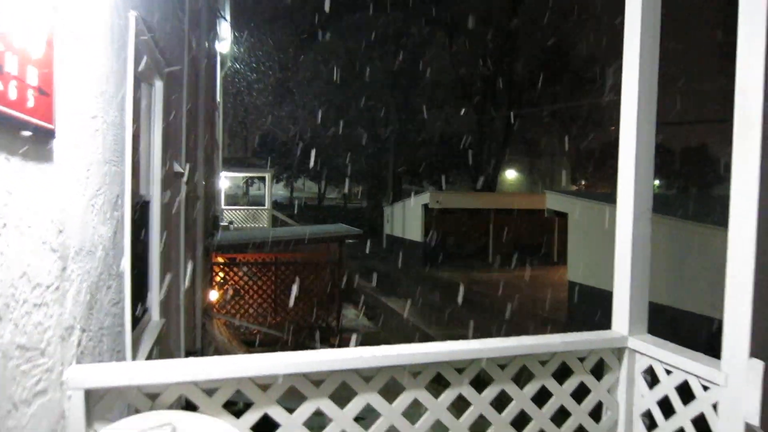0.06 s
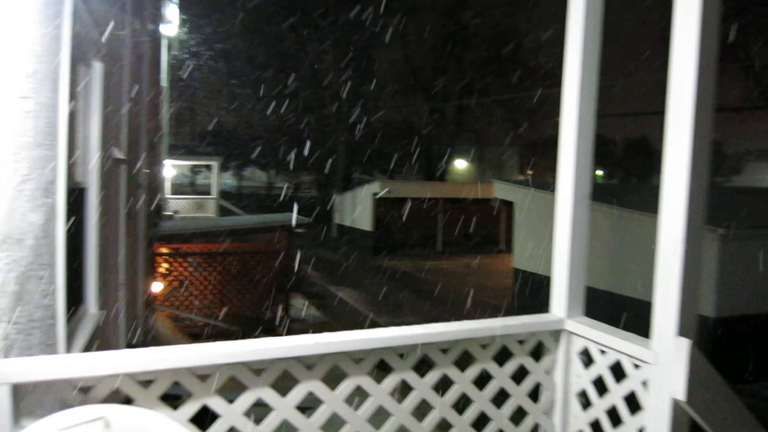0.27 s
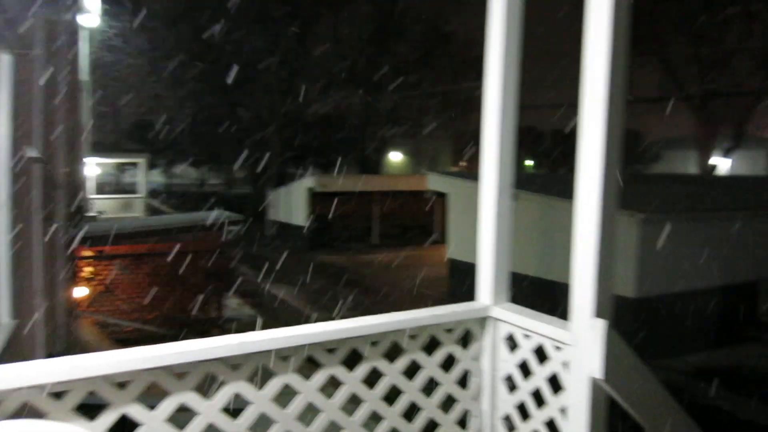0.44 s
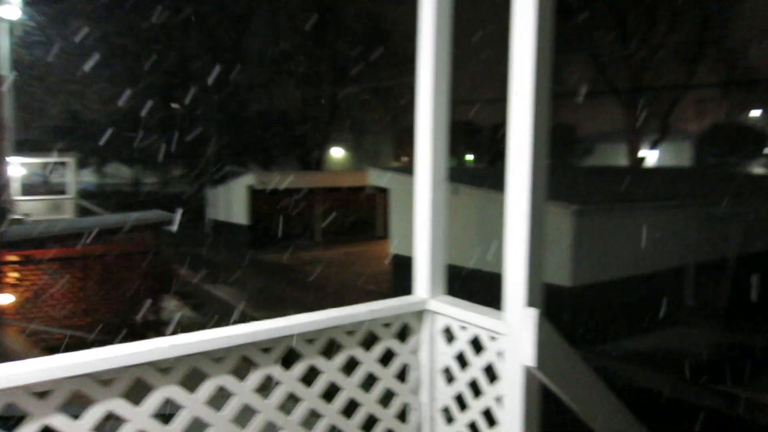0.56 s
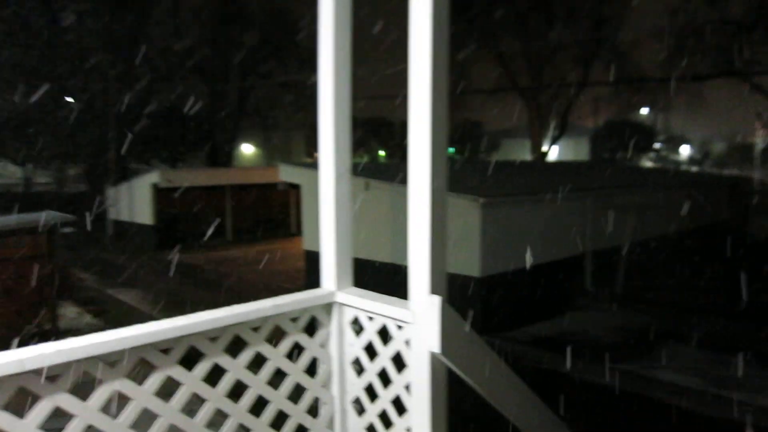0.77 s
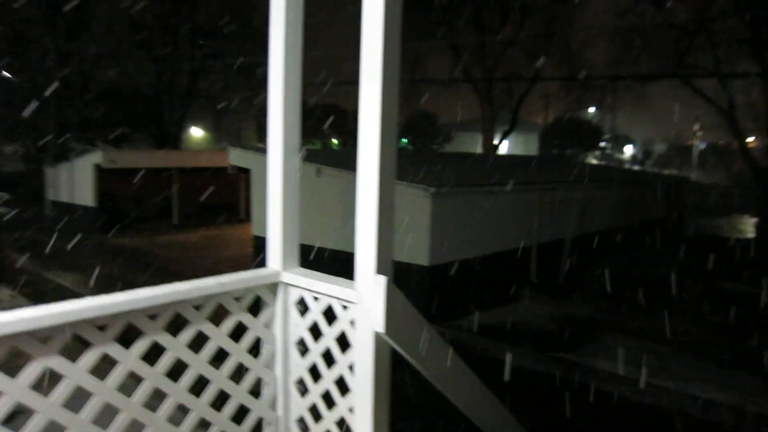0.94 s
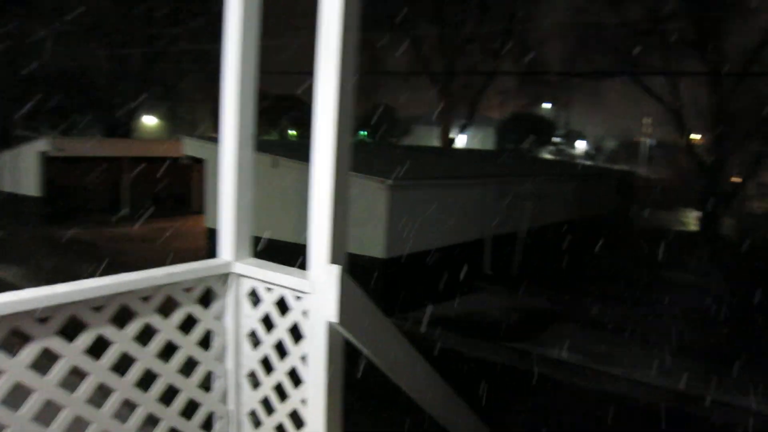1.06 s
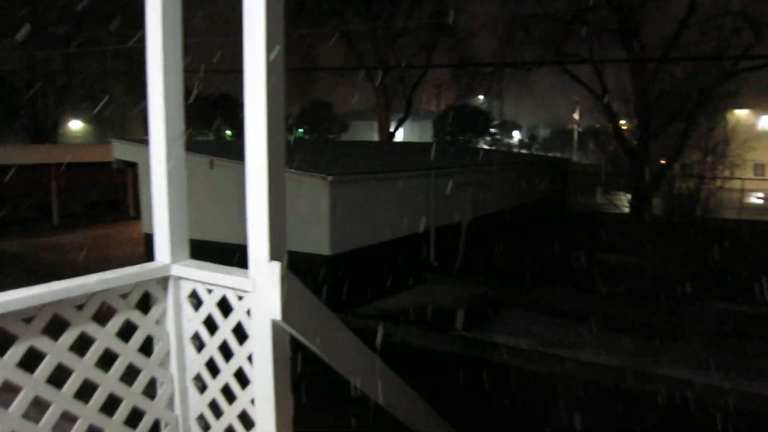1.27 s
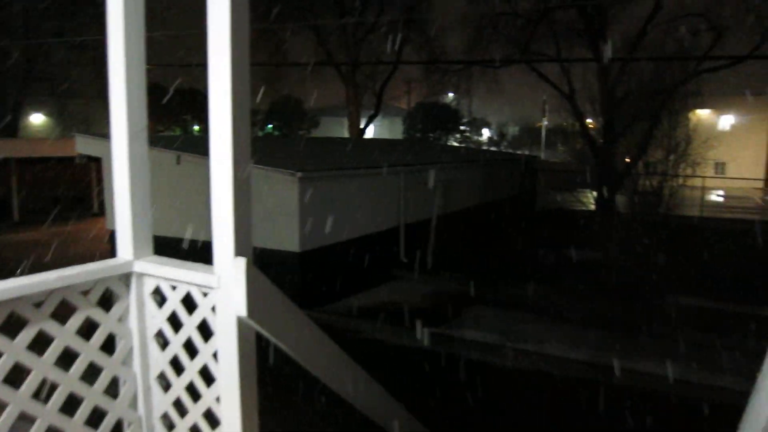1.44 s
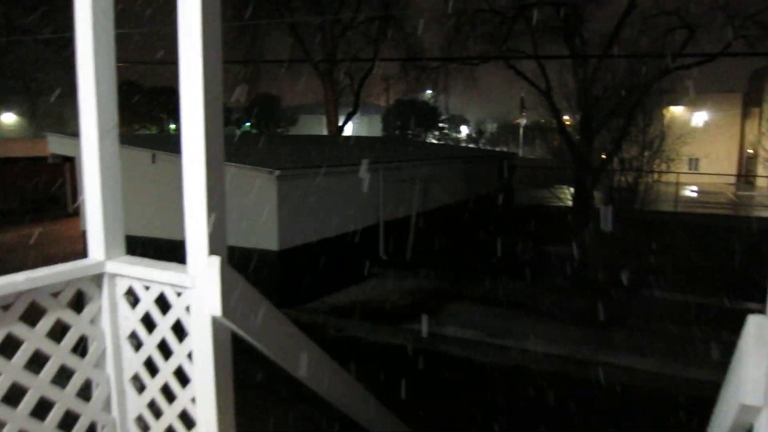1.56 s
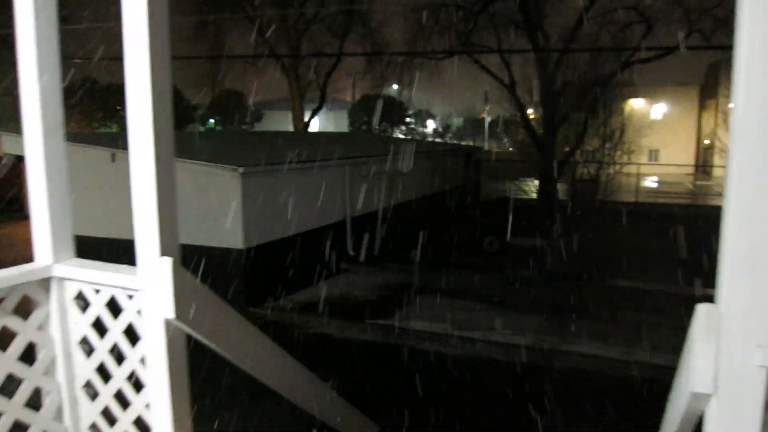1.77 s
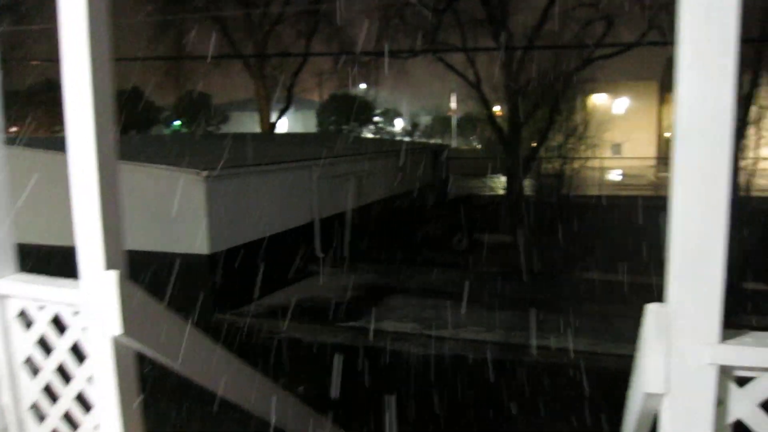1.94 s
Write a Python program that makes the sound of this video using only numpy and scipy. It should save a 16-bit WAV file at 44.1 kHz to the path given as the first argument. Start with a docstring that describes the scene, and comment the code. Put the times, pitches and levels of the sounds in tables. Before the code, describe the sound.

Uneven wind buffets the microphone with low rumbles and thumps, a faint hiss behind.

```python
"""Wind rumbles right on a handheld microphone, out on a porch on a snowy night.
Eddies at the ports push left and right mostly in opposite phase, louder and brighter as the
flow rises; the hardest ones thump. Close by, a few icy flakes tick, with soft high rustles.
Far behind lie a steady rush of wind and town and a faint hiss."""
import sys
import numpy as np
from scipy import signal
from scipy.fft import rfft, irfft
from scipy.io import wavfile
from scipy.ndimage import uniform_filter1d, minimum_filter1d

SR = 44100
rng = np.random.default_rng(int(sys.argv[2]) if len(sys.argv) > 2 else 0)


def inscribe(sig):
    """Save sig as 16-bit PCM at rate SR to the path in sys.argv[1].

    A 1-D sig is mono; a 2-D sig holds one channel per row.
    Samples are clipped to [-1, 1] before scaling.
    """
    pcm = np.round(np.clip(np.atleast_2d(sig).T, -1, 1) * 32767)
    wavfile.write(sys.argv[1], SR, pcm.astype(np.int16))


N = 88200
T = np.arange(N) / SR
FREQS = np.maximum(np.fft.rfftfreq(N, 1 / SR), 1)
IN_PHASE, OPPOSED = np.array([[1], [1]]), np.array([[1], [-1]])  # left and right polarity

# distant rush and hiss, alike in both channels: pitch_hz, half_octave_db
RUSH_CENTRE = [(30, -67.5), (100, -83.5), (300, -63.5), (550, -66.5), (900, -63), (1300, -68.5),
               (1900, -74.5), (2800, -79.5), (3500, -86.5), (5300, -85.5), (6500, -87), (11500, -84),
               (15500, -88.5)]
# the part of the rush that differs between left and right: pitch_hz, half_octave_db
RUSH_WIDE = [(100, -73), (600, -65.5), (1200, -68), (2000, -75.5), (2500, -81.5), (2900, -82.5),
             (3600, -90.5), (7000, -94.5), (10000, -89.5), (13000, -85.5), (15500, -89)]
# soft high rustles: centre_s, level_db, half_width_s
RUSTLES = [(.487, -80.5, 0.014), (.675, -76.5, 0.0022), (1.015, -81.5, 0.0063), (1.928, -80, 0.009)]
# their colour: pitch_hz, half_octave_db
RUSTLE_COLOUR = [(2500, 2), (5000, -6), (8000, -2), (13000, 1.5), (16000, -5)]
# icy flakes landing near the microphone: start_s, level_db
FLAKES = [(0.129, -62.5), (.296, -61), (0.787, -66), (1.048, -59)]
# the ring of a landing flake: pitch_hz, gain_db, t60_s
FLAKE_MODES = [(1130, 11, 0.023), (1533, 4, 0.034), (2810, -4, 0.033), (3030, -7.5, 0.025)]
# wind strength at the microphone, 0 dB being a full gust: time_s, level_db
GUSTS = [(0, -19), (.09, -22.5), (.14, -42.5), (.22, -30), (.4, -23.5), (.435, -10.5), (.5, -12.5),
         (.56, -18.5), (.625, -16.5), (.665, -3), (.72, -11), (.81, -24), (.84, -8), (.92, -9), (.99, -24),
         (1.1, -22.5), (1.16, -18.5), (1.29, -19), (1.35, -12.5), (1.41, -2.5), (1.49, -9), (1.53, -15),
         (1.68, -15), (1.82, -27.5), (2, -24.5)]
# short buffets on top of the gusts: centre_s, rise_db, half_width_s
BUFFETS = [(0.199, 5.5, 0.0053), (0.237, 14.5, 0.0048), (0.268, 15, 0.0071), (0.342, 14, 0.0093),
           (0.371, 6, 0.0043), (.463, 5, 0.0053), (0.523, 11, 0.0063), (.596, 17, 0.01), (.743, 11, 0.0033),
           (0.954, 11, 0.0029), (1.022, 20, 0.0069), (1.075, 14.5, 0.0045), (1.127, 13, 0.01),
           (1.175, 5.5, 0.0045), (1.218, 7.5, 0.0041), (1.317, 13, 0.0045), (1.501, 9, 0.0088),
           (1.546, 8, 0.0036), (1.587, 11, 0.0086), (1.659, 5, 0.0075), (1.702, 5.5, 0.0082)]
# rumble at the ports in a full gust: pitch_hz, half_octave_db
RUMBLE_COLOUR = [(20, -59.5), (32, -49.5), (55, -30), (90, -19), (130, -16), (240, -18), (400, -21.5),
                 (600, -27.5), (900, -36.5), (1300, -50.5), (2000, -67.5)]
# how steeply each register follows the flow: pitch_hz, slope_db_per_db
FLOW_RESPONSE = [(50, .5), (120, 0.79), (240, 0.95), (400, 1.19), (650, 2.04), (1300, 2.6)]
# hard eddies hitting the ports: centre_s, peak_db, half_width_s
THUMPS = [(0.199, -18.5, 0.0017), (0.344, -19.5, .0019), (0.373, -21.5, 0.0018), (.463, -14, 0.0011),
          (0.5239, -11, 0.00057), (0.6005, -8, 0.00051), (.671, -4.5, 0.001), (0.702, -15.5, 0.0016),
          (0.8296, -3, .00033), (0.9094, -8, 0.00057), (1.018, -23, 0.00035), (1.077, -18.5, .0012),
          (1.125, -16.5, 0.00063), (1.318, -8, 0.00069), (1.3394, -19, 0.00035), (1.3496, -17.5, 0.00036),
          (1.3939, -12.5, 0.00049), (1.4155, -1.5, 0.00064), (1.579, -21.5, 0.00052)]


def undb(db):
    """Decibels to gain."""
    return 10 ** (np.asarray(db) / 20)


def at_pitch(table, hz):
    """Read a (pitch_hz, value) table on a log-frequency axis."""
    pitches, values = np.array(table).T
    return np.interp(np.log(hz), np.log(pitches), values)


def wander(rate_hz):
    """Smooth random wander with a spread of 1."""
    drift = irfft(rfft(rng.standard_normal(N)) * np.exp(-(FREQS / rate_hz) ** 2), N)
    return drift / drift.std()


def swell(centre_s, half_width_s):
    """A smooth rise and fall around a moment."""
    return np.exp(-((T - centre_s) / half_width_s) ** 2 / 2)


def coloured_noise(table):
    """Noise with the given level in each half octave, rolled off below 20 Hz."""
    white = rfft(rng.standard_normal(N))
    per_half_octave = np.sqrt(SR / 2 / (FREQS * np.log(2) / 2))
    low_cut = 1 - np.exp(-(FREQS / 20) ** 2)
    return irfft(white * per_half_octave * undb(at_pitch(table, FREQS)) * low_cut, N)


def bands(sound, count):
    """Split into overlapping half-octave bands from 20 Hz up: (centre_hz, band)."""
    spectrum = rfft(sound)
    for hz in 20 * 2 ** (np.arange(count) / 2):
        triangle = np.maximum(1 - 2 * abs(np.log2(FREQS / hz)), 0)
        yield hz, irfft(spectrum * triangle, N)


def pan(sound, left_db):
    """Place a sound left_db louder on the left than on the right."""
    return sound * undb(OPPOSED * left_db / 2)


def distant_rush(flicker_db=0.32):
    """Wind and town far off, with a faint hiss on top; each band flickers slightly."""
    out = 0
    for colour, polarity in ((RUSH_CENTRE, IN_PHASE), (RUSH_WIDE, OPPOSED)):
        for _, band in bands(coloured_noise(colour), count=21):
            out = out + polarity * band * undb(flicker_db * wander(rate_hz=60))
    return out


def rustles():
    """Brief soft swells of high hiss, in the centre."""
    envelope = sum(undb(db) * swell(centre, width) for centre, db, width in RUSTLES)
    return envelope * coloured_noise(RUSTLE_COLOUR)


def flake_ticks(attack_s=0.0014):
    """Icy flakes land softly, close by on the left; each rings a few short modes."""
    out = 0
    for start, level_db in FLAKES:
        age = np.maximum(T - start, 0)
        attack = 1 - np.exp(-age / attack_s)
        for hz, gain_db, t60 in FLAKE_MODES:
            detune = 1 + 0.0078 * rng.standard_normal()
            ring = np.sin(2 * np.pi * hz * detune * age)
            decay = np.exp(-np.log(1000) * age / t60)
            out = out + undb(level_db + gain_db) * attack * ring * decay
    return pan(out, left_db=12)


def eddy_thumps(roundness=7.8, in_phase_db=-19):
    """A hard eddy sweeps the ports: one swing of suction and pressure, deeper for wide eddies."""
    out = 0
    for centre, peak_db, half_width in THUMPS:
        passage = (T - centre) / half_width
        swing = passage / (1 + passage ** 2 / (2 * roundness)) ** roundness
        out = out + undb(peak_db) * swing / swing.max()
    return out * (OPPOSED + undb(in_phase_db))


def airflow_db(flutter_db=2.6):
    """Strength of the flow at the microphone: slow gusts, short buffets and a quick flutter."""
    gusts = np.interp(T, *np.array(GUSTS).T)
    buffets = sum(db * swell(centre, width) for centre, db, width in BUFFETS)
    return gusts + buffets + flutter_db * wander(rate_hz=102)


def wind_rumble(in_phase_db=-18.5, in_phase_db_per_octave=0.65):
    """Turbulence at the ports: the bass lingers, the upper registers break out only in strong flow."""
    flow_db = airflow_db()
    opposed_bands = bands(coloured_noise(RUMBLE_COLOUR), count=15)
    in_phase_bands = bands(coloured_noise(RUMBLE_COLOUR), count=15)
    out = 0
    for (hz, opposed), (_, in_phase) in zip(opposed_bands, in_phase_bands):
        in_phase_gain = undb(in_phase_db + in_phase_db_per_octave * np.log2(hz / 250))
        eddies = OPPOSED * opposed + in_phase_gain * in_phase
        out = out + eddies * undb(at_pitch(FLOW_RESPONSE, hz) * flow_db)
    return out


def scene():
    """From the porch: wind on the microphone, the quiet night behind it."""
    mix = wind_rumble() + eddy_thumps() + distant_rush() + flake_ticks() + rustles()
    return pan(mix, left_db=0.5)


def record(dry, ceiling_db=-1.52, recovery_db_per_s=6.5, top_hz=15650):
    """The recorder's limiter ducks on the hardest thumps and slowly recovers; a filter cuts the top."""
    peak_db = 20 * np.log10(abs(dry).max(axis=0) + 1e-9)
    over_db = np.maximum(peak_db - ceiling_db, 0)
    recovery_db = recovery_db_per_s * T
    duck_db = np.maximum.accumulate(over_db + recovery_db) - recovery_db
    held_gain = minimum_filter1d(undb(-duck_db), size=129)
    gain = uniform_filter1d(held_gain, size=129)  # eases down over 3 ms ahead of a peak
    high_cut = signal.ellip(10, 0.2, 70, top_hz, fs=SR, output="sos")
    return signal.sosfilt(high_cut, dry * gain)


dry = scene()
out = record(dry)
inscribe(out)
```